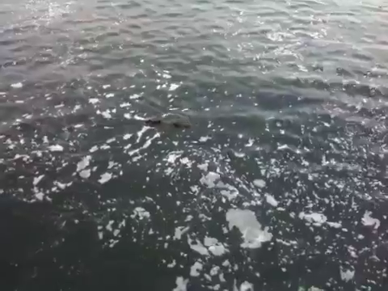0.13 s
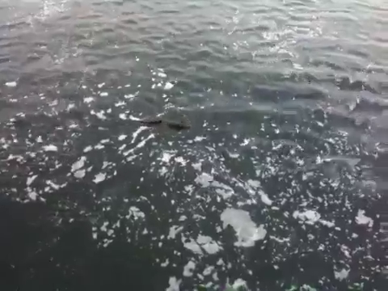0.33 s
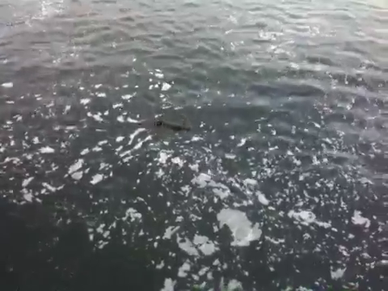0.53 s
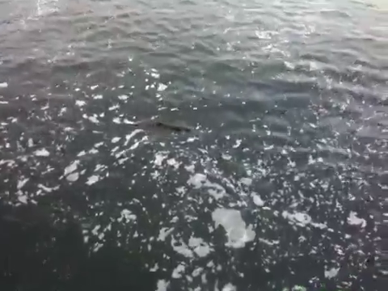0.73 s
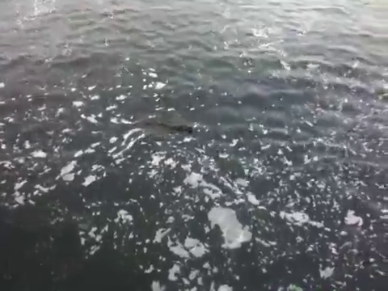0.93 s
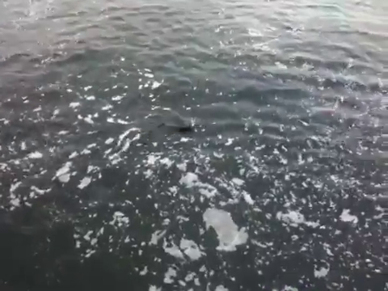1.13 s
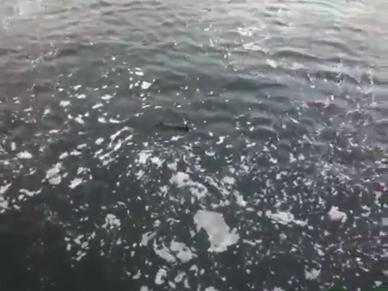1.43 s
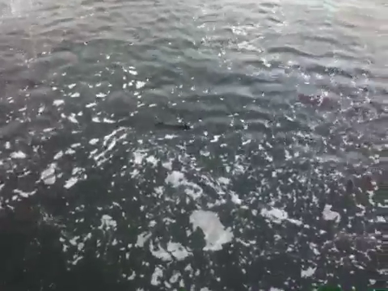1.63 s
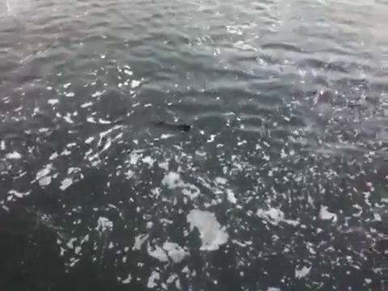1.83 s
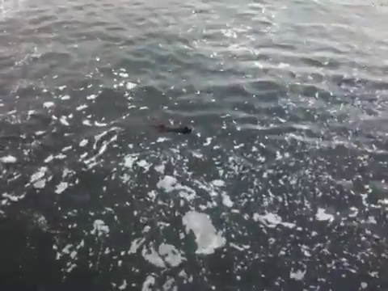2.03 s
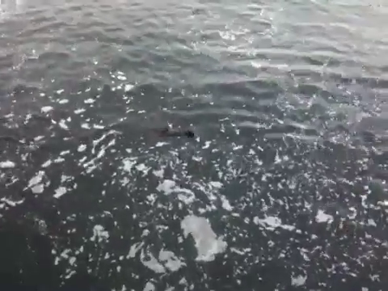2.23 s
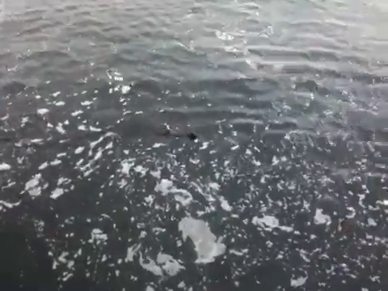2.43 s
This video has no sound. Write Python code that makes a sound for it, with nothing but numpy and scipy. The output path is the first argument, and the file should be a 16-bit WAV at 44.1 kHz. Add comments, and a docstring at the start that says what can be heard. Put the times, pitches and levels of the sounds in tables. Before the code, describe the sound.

A steady wash of moving water carries tiny plips, gurgles and gentle lapping in the open air. Foam fizzes as a wavelet breaks, with a few faint, brief chirps, then eases off while weak wind rumbles underneath.

```python
"""Foamy, rippling water runs past in a steady rush, a wide bed of shaped noise, in mono.
A wavelet breaks in the first second: tiny bursts fizz and bubbles ring, then the water settles.
Small splashes, plips, glugs of trapped air and soft laps poke out a little, along with short,
faint chirps, perhaps of an unseen animal. Light wind rumbles underneath, and a wind
suppressor ducks the bass whenever it is weak."""
import sys
import numpy as np
from scipy import signal
from scipy.fft import rfft, irfft
from scipy.io import wavfile
from scipy.ndimage import uniform_filter1d

SR = 44100
rng = np.random.default_rng(int(sys.argv[2]) if len(sys.argv) > 2 else 0)


def wav_record(signal):
    """Record a signal, one row per channel, as 16-bit PCM in the file named by sys.argv[1]."""
    frames = np.transpose(np.atleast_2d(signal))
    bounded = np.clip(frames, -1, 1)
    # unit amplitude maps onto the largest positive 16-bit level
    quanta = np.round(bounded * 32767).astype(np.int16)
    wavfile.write(sys.argv[1], SR, quanta)


N = 114660
TIME = np.arange(N) / SR

# Tone of the rushing water: (frequency [Hz], relative level [dB])
RUSH_EQ = [(30, -41), (60, -26), (90, -22.5), (130, -15), (180, 0), (300, 0), (500, -3), (800, -6),
           (1300, -8.5), (1850, -9), (2130, -7), (2450, -10.5), (2800, -10.5), (3060, -14.5), (3500, -12.5),
           (4300, -13.5), (5300, -18), (7200, -20), (9000, -28), (10200, -29.5), (11500, -40),
           (13500, -36.5), (15800, -34)]
# Fader ride on the rush: (time [s], gain [dB])
RUSH_RIDE = [(.1, -0.03), (.8, -.5), (1.3, -0.5), (1.7, -1), (2.2, -0.3), (2.6, 0)]
# Tone of the bursting foam: (frequency [Hz], relative level [dB])
FIZZ_EQ = [(300, -29), (1000, -12.5), (1700, 1), (2100, -1), (2650, -0.5), (3100, -4.5), (4200, -7.5),
           (5200, -11), (7000, -12.5), (10000, -15.5), (12000, -23), (14000, -21), (15800, -16.5)]
# How hard the wavelet foams: (time [s], gain [dB])
FOAM_RIDE = [(.1, 1.5), (.27, -3), (.45, 1), (.55, 1), (.67, 3.5), (.9, 1.5), (1.05, -1.5), (1.3, -1),
             (1.55, -7), (1.9, -3.5), (2.25, -30), (2.6, -15)]
# Single bubbles that stand out: (time [s], pitch [Hz], level [dB])
PLIP_CUES = [(.138, 2210, -38), (0.188, 2160, -40), (.762, 2400, -43), (1.248, 3100, -46),
             (1.611, 2800, -46)]
# Small splashes: (time [s], length [s], level [dB], band centre [Hz])
SPLASH_CUES = [(0.317, 0.015, -57, 8100), (0.444, 0.017, -62, 9500), (.567, 0.0066, -54, 8100),
               (0.33, 0.011, -57, 5200), (0.653, 0.015, -55, 7350), (0.669, 0.015, -56, 7600),
               (0.69, 0.0097, -53, 4700), (0.817, 0.011, -55, 7000), (1.261, 0.012, -56, 6500),
               (2.008, .022, -49, 560), (2.288, 0.03, -58, 7600), (2.485, .028, -47.5, 636),
               (2.398, .01, -63, 9000)]
# Air trapped by ripples: (centre time [s], length [s], pitch [Hz], peak level [dB])
GLUG_CUES = [(.172, .04, 175, -45.5), (.557, .04, 213, -48.5), (.696, .035, 297, -47),
             (1.032, .028, 394, -47.5), (1.412, 0.019, 677, -44.5), (1.726, 0.026, 736, -45),
             (1.88, .025, 330, -45), (2.019, 0.024, 258, -43), (2.024, 0.023, 490, -45),
             (2.364, 0.031, 400, -51), (2.446, .028, 245, -49), (2.508, .035, 212, -42.5)]
# Lapping waves: (centre time [s], length [s], level [dB])
LAP_CUES = [(.18, .08, -60.5), (.275, 0.035, -60.5), (.39, .06, -61), (.52, 0.043, -59), (.575, 0.04, -60),
            (.632, 0.03, -57.5), (.76, 0.048, -59.5), (.83, 0.031, -59), (.89, .04, -61),
            (.982, .06, -58.5), (1.13, 0.047, -60), (1.315, .1, -59), (1.485, 0.043, -60.5),
            (1.72, 0.041, -59), (1.888, 0.029, -59), (2.05, .06, -59.5), (2.125, .05, -60.5),
            (2.266, 0.038, -59.5), (2.385, .08, -56), (2.585, 0.041, -56)]
# Faint chirps: (centre time [s], length [s], pitch [Hz], level [dB], glide [share of pitch])
CHIRP_CUES = [(.136, .014, 5900, -47, -.03), (.298, .013, 6800, -55, 0), (0.318, .014, 6250, -52, -.04),
              (0.334, .009, 5900, -48, 0), (0.35, .011, 5920, -56, 0), (0.447, .017, 2640, -41.5, -.18),
              (.576, 0.019, 2130, -45, -0.032), (.628, 0.022, 2650, -45.5, 0.22),
              (.679, 0.031, 2120, -50, 0.24), (0.72, 0.015, 2600, -47, 0), (0.8, 0.01, 2680, -40, -0.027),
              (0.811, .016, 2245, -43, 0.43), (.951, 0.023, 2270, -46, -.27),
              (1.648, .07, 2020, -50, 0.324)]


def rush(level_db=-44.5, patchy_db=0.52, flicker_db=0.06):
    """The main bed: a wide wash of moving water, in faint drifting patches."""
    frames, bins = N // 256 + 5, 513
    real, imag, patches = rng.standard_normal((3, frames, bins))
    patches = uniform_filter1d(patches, size=7, axis=0)  # smear in time
    patches = unit(uniform_filter1d(patches, size=10, axis=1))  # and in frequency
    spectra = (real + 1j * imag) * amp(patchy_db * patches)
    noise = signal.istft(spectra.T, nperseg=1024, noverlap=768)[1][:N]
    return equalise(noise, RUSH_EQ) * amp(level_db + ride(RUSH_RIDE) + flicker_db * drift(3.6, 40))


def fizz(level_db=-53, clump_db=0.5):
    """Thousands of tiny foam bubbles burst as the wavelet breaks."""
    bursts = equalise(pops(per_s=6000, spread_db=3.5), FIZZ_EQ)
    return bursts * amp(level_db + ride(FOAM_RIDE) + clump_db * drift(5.57, 39.3))


def bubble(hz, ring_cycles, rise=0.02):
    """A bubble rings for a few cycles, bending up in pitch as it nears the surface."""
    cycles = np.arange(int(6 * ring_cycles / hz * SR)) * hz / SR
    age = cycles / ring_cycles
    envelope = (1 - np.exp(-cycles)) * np.exp(-age)
    return envelope * np.sin(2 * np.pi * cycles * (1 + rise * age))


def babble(level_db=-54.5, per_s=700, sizes=36, low_hz=593, high_hz=4930, tilt_db_per_oct=-0.5):
    """Bubbles of many sizes ring at random, a touch louder while the water foams."""
    layer = np.zeros(N)
    for hz in np.geomspace(low_hz, high_hz, sizes):
        ring = amp(tilt_db_per_oct * np.log2(hz / low_hz)) * bubble(hz, ring_cycles=6.9)
        layer += signal.oaconvolve(pops(per_s / sizes, spread_db=0.5), ring)[:N]
    return unit(layer) * amp(level_db + 0.14 * ride(FOAM_RIDE))


def trickle(level_db=-60.5, per_s=240, sizes=10, centre_hz=2040, detune=0.039):
    """Bubbles of nearly one size ring where the wavelet foams."""
    layer = np.zeros(N)
    for hz in centre_hz * (1 + detune * np.linspace(-1, 1, sizes)):
        layer += signal.oaconvolve(pops(per_s / sizes, spread_db=3), bubble(hz, ring_cycles=3))[:N]
    return unit(layer) * amp(level_db + ride(FOAM_RIDE))


def splash(length, db, hz):
    """A short spatter of water: bright for fine droplets, dark for a slosh."""
    n = int(length * SR)
    droplets = pops(per_s=4500, spread_db=2.5)[:n]
    return amp(db) * band(droplets, hz, octaves=0.35) * signal.windows.tukey(n, .5)


def slap(peak_db, width_s=0.000094):
    """A ripple folds over: one sharp push and pull."""
    offset = np.arange(-64, 64) / SR / width_s
    return -amp(peak_db) * offset * np.exp((1 - offset ** 2) / 2)


def glug(length, hz, db, rise=0.2, wobble=0.12):
    """An air pocket under a ripple swells and rings unsteadily, rising in pitch as it closes."""
    progress = np.linspace(0, 1, int(length * SR))
    pitch = hz * (1 + rise * (progress - .5) + wobble * jitter(len(progress), smooth_samples=150))
    cycles = np.cumsum(pitch) / SR + rng.random()
    swell = np.sin(np.pi * progress ** 0.94)
    return amp(db) * swell * np.sin(2 * np.pi * cycles)


def lap(length, db):
    """A wave laps: a soft, unpitched bump of low noise."""
    n = int(length * SR)
    push = band(rng.standard_normal(N), hz=138, octaves=0.28)[:n]
    return amp(db) * unit(push * signal.windows.tukey(n, .7))


def chirp(length, hz, db, glide, roughness=0.037):
    """A thin whistle that swells and slides, raspier the higher it sits."""
    progress = np.linspace(0, 1, int(length * SR))
    waver = roughness * jitter(len(progress), smooth_samples=30)
    pitch = hz * (1 + glide * (progress - .5) + waver)
    whistle = np.sin(2 * np.pi * np.cumsum(pitch) / SR)
    rasp = 1.5 * hz / 6000 * band(rng.standard_normal(N), hz, octaves=0.1)[:len(progress)]
    swell = np.sin(np.pi * progress) ** 2
    return amp(db) * swell * unit(whistle + rasp) / np.sqrt(2)


def wind(level_db=-74, gust_db=0.5):
    """A soft, lumpy rumble of wind, far back in the mix."""
    gusts = amp(level_db - gust_db * drift(7.9, 11))
    return gusts * band(rng.standard_normal(N), hz=136, octaves=0.39)


def wind_gate(x, crossover_hz=155, threshold_db=-61.5, slope=4, range_db=15, window_s=0.04):
    """A wind suppressor ducks the bass whenever it falls under the threshold."""
    low_pass = 1 / (1 + (np.fft.rfftfreq(N, 1 / SR) / crossover_hz) ** 20)
    bass = irfft(rfft(x) * low_pass, N)
    window = int(window_s * SR)
    power = uniform_filter1d((bass ** 2).mean(0), window)
    bass_db = 10 * np.log10(abs(power) + 1e-14)
    cut_db = np.clip(slope * (threshold_db - bass_db), 0, range_db)
    gain = uniform_filter1d(amp(-cut_db), window // 2)
    return x - bass * (1 - gain)


def amp(db):
    """Decibels to gain."""
    return 10 ** (np.asarray(db) / 20)


def unit(x):
    """Normalises to rms 1."""
    return x / np.sqrt(np.mean(x ** 2) + 1e-20)


def equalise(x, points):
    """Applies an EQ curve drawn on a log-frequency axis, at rms 1."""
    hz, db = np.transpose(points)
    gain_db = np.interp(np.log(np.fft.rfftfreq(N, 1 / SR) + 1), np.log(hz + 1), db)
    return unit(irfft(rfft(x) * amp(gain_db), N))


def band(x, hz, octaves):
    """A bell-shaped band-pass around hz, at rms 1."""
    distance_oct = np.log2((np.fft.rfftfreq(len(x), 1 / SR) + 1) / hz)
    bell = np.exp(-.5 * (distance_oct / octaves) ** 2)
    return unit(irfft(rfft(x) * bell, len(x)))


def ride(points):
    """A fader ride, read at every sample."""
    return np.interp(TIME, *np.transpose(points))


def drift(low_hz, high_hz):
    """A random LFO of rms 1."""
    rates = np.geomspace(low_hz, high_hz, 20)
    return unit(sum(np.sin(2 * np.pi * (hz * TIME + rng.random())) / np.sqrt(hz) for hz in rates))


def jitter(n, smooth_samples):
    """Smoothed noise to unsettle a pitch."""
    return unit(uniform_filter1d(rng.standard_normal(N), smooth_samples))[:n]


def pops(per_s, spread_db):
    """Random clicks, mostly small, a few large."""
    strength = amp(spread_db * np.minimum(rng.exponential(1, N), 5))
    return strength * rng.choice([-1, 1], N) * (rng.random(N) < per_s / SR)


def add(mix, start_s, sound):
    """Drops a sound into the mix on its cue."""
    part = mix[max(round(start_s * SR), 0):][:len(sound)]
    part += sound[:len(part)]


def scene():
    """Beds of water and wind with spot effects on top, the same in both ears."""
    mix = rush() + wind() + fizz() + babble() + trickle()
    for start, hz, db in PLIP_CUES:
        add(mix, start, amp(db) * bubble(hz, ring_cycles=11))
    for start, length, db, hz in SPLASH_CUES:
        add(mix, start, splash(length, db, hz))
    ripple = slap(peak_db=-33)
    add(mix, 2.2945 - len(ripple) / 2 / SR, ripple)
    for centre, length, hz, db in GLUG_CUES:
        add(mix, centre - length / 2, glug(length, hz, db))
    for centre, length, db in LAP_CUES:
        add(mix, centre - length / 2, lap(length, db))
    for centre, length, hz, db, glide in CHIRP_CUES:
        add(mix, centre - length / 2, chirp(length, hz, db, glide))
    return np.array([mix, mix])


def record(dry):
    """Master chain: wind suppressor, a moment of silence at the head, then a steep high cut."""
    silence_s, fade_s, high_cut_hz = 0.0835, 0.001, 15900
    fade_in = np.clip((TIME - silence_s) / fade_s, 0, 1)
    high_cut = signal.firwin(511, high_cut_hz, window=("kaiser", 9), fs=SR)
    return signal.oaconvolve(wind_gate(dry) * fade_in, high_cut[None], "same")


dry = scene()
out = record(dry)
wav_record(out)
```